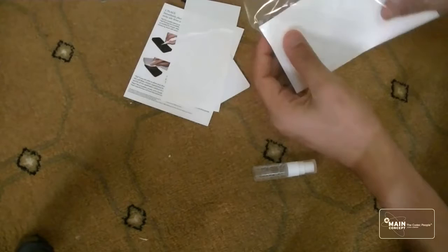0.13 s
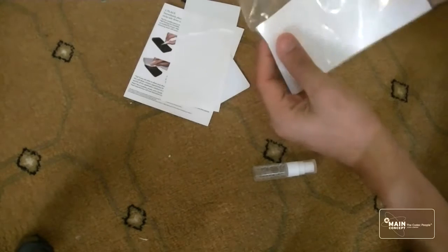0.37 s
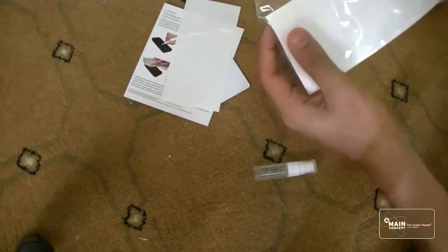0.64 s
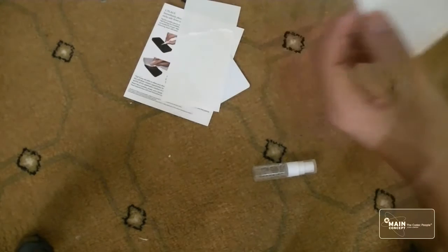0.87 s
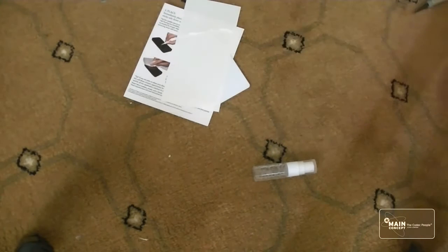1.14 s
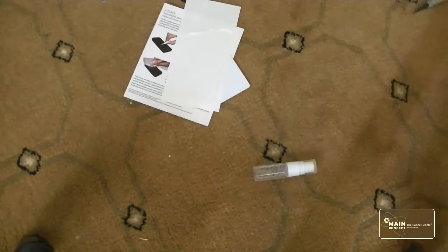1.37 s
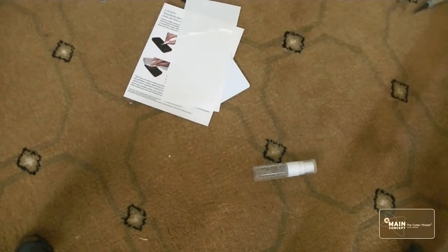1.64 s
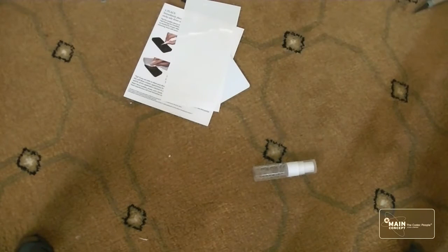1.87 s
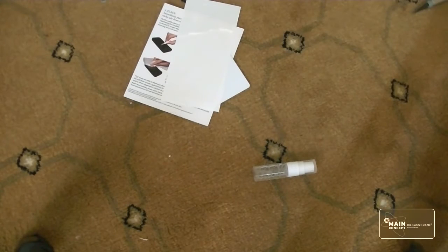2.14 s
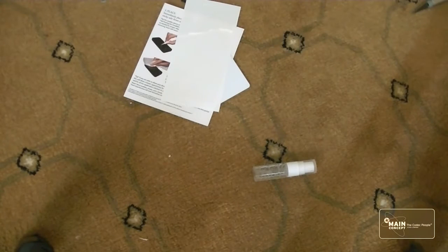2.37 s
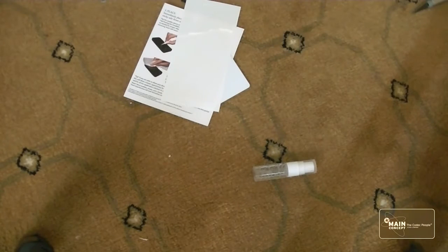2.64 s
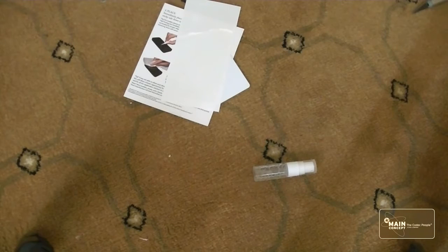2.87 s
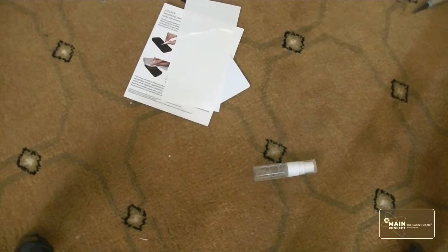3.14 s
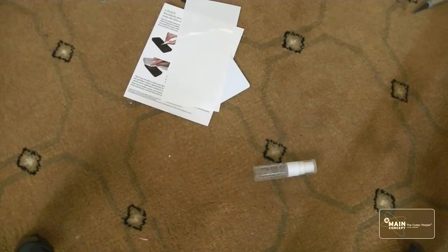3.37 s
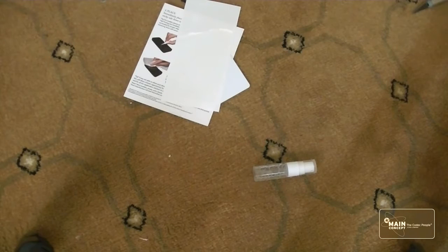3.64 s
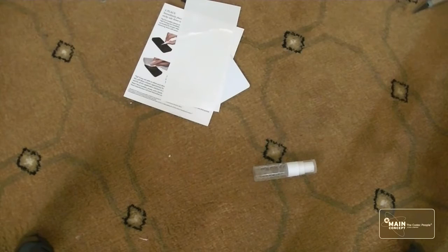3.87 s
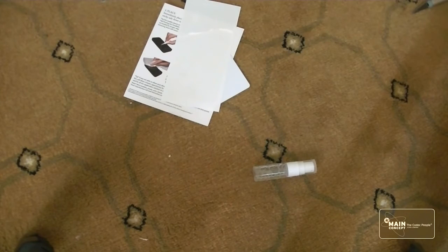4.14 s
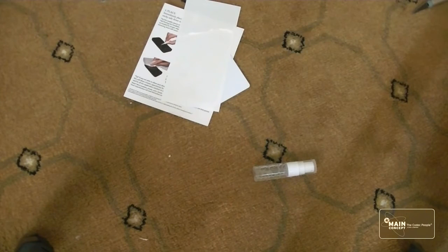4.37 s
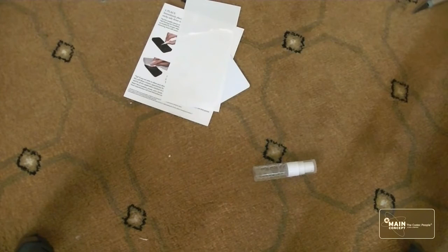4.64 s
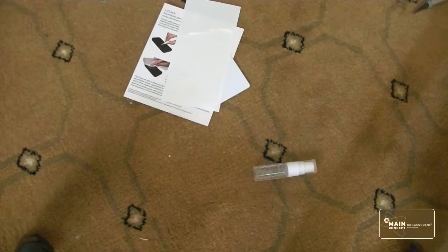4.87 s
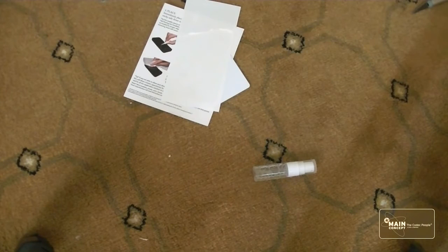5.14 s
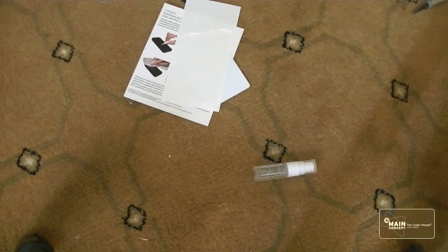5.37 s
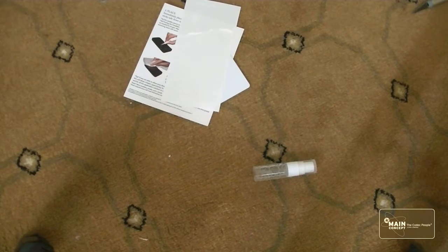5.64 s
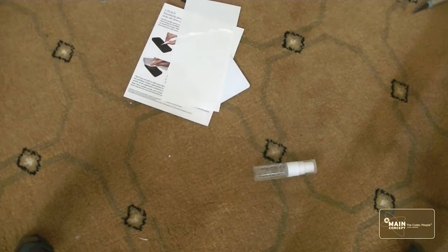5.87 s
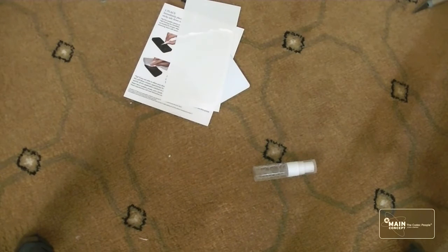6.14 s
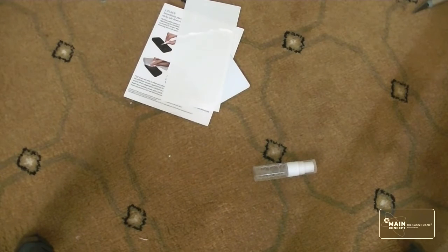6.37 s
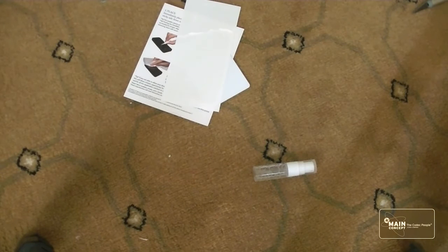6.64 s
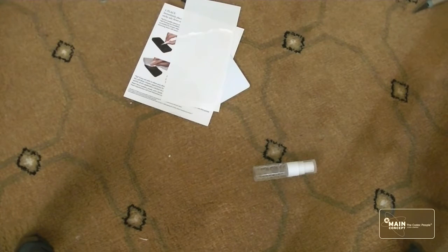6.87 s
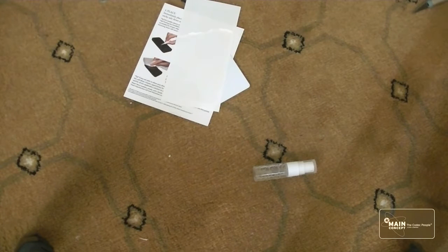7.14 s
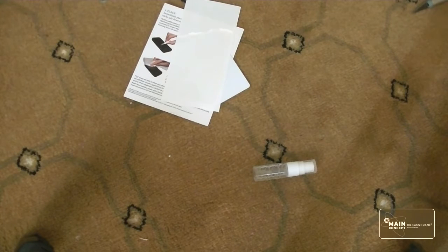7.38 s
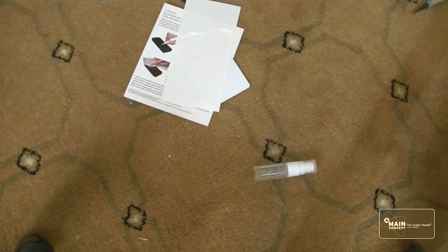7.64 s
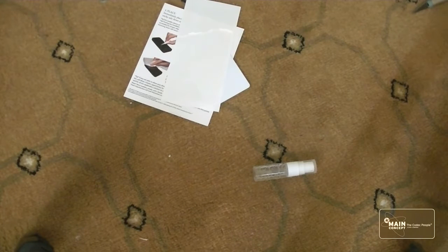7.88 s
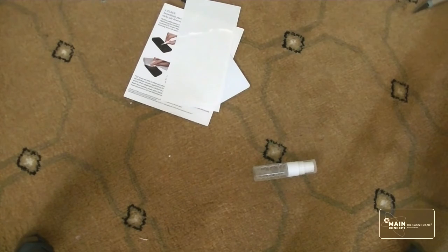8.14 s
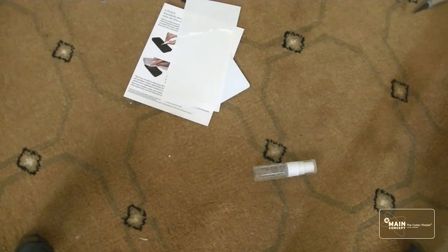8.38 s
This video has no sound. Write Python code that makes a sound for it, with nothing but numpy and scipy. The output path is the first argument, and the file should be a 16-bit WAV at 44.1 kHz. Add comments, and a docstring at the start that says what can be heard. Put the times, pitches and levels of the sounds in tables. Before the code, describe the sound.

A thin plastic sleeve is handled very near a stereo microphone in a quiet carpeted room, slightly stronger on the right. From 0 to 0.5 seconds, a quick cluster of dry crinkles and rustle; then sparse isolated ticks until about 1.5. From 1.6 to 3, scattered snaps with dull soft finger bumps. Between 3.1 and 4.2 the crackling thickens, with sharper pops near 3.2 and 3.5 and a rustle swell at 4.1. Some snaps around 4.45, then a thin, quiet stretch to 5.4. A strong burst of crackle and sliding rustle at 5.8 to 6.05, then separate clear snaps through 7.4. A tiny squeak near 7.56, a loud pop at 7.6, and from 7.9 to 8.4 the densest, loudest crumpling, with bumps, easing slightly before it cuts off. Very faint low hum and soft air throughout; short room decay.

```python
"""Carpeted room: hands work a thin plastic sleeve just beside a camera.
Creases buckle with short dry snaps: ragged impulses through broad resonances. Under them, clumps of
smaller creases crackle and noise in the same resonances makes a sliding rustle. Fingers bump the sleeve
(dull noise pushes) and taut film squeaks (wavering sines). A far machine hums at two partials over
room-tone noise; decaying noise tails give the brief room answer."""
import sys
import numpy as np
from scipy import signal
from scipy.fft import rfft, irfft, next_fast_len
from scipy.io import wavfile
from scipy.ndimage import map_coordinates

SR = 44100
rng = np.random.default_rng(int(sys.argv[2]) if len(sys.argv) > 2 else 0)


def natural_amplitude(level_db):
    """Convert a level in decibels to a linear amplitude factor, elementwise."""
    exponent = np.asarray(level_db, float) / 20
    return 10 ** exponent


def dump(signal):
    """Clip the signal to [-1, 1] and save it as 16-bit WAV at the path in sys.argv[1]."""
    limited = np.clip(np.atleast_2d(signal).T, -1, 1)
    pcm = np.round(limited * 32767).astype(np.int16)
    wavfile.write(sys.argv[1], SR, pcm)


N = 375291


def unit(x):
    """Scale to rms 1."""
    return x / np.sqrt(np.mean(x ** 2) + 1e-20)


def along(points, hz):
    """(Hz, value) points read on a log-frequency axis."""
    f, v = np.transpose(points)
    return np.interp(np.log(hz + 1), np.log(f + 1), v)


def curves(rows, s):
    """Each column after the time, read at times s."""
    t, *cols = np.transpose(rows)
    return [np.interp(s, t, c) for c in cols]


def wobble(rate_hz, s):
    """Smooth random curve, rate_hz knots a second, read at times s."""
    knots = rng.standard_normal(int(N * rate_hz / SR) + 4)
    return map_coordinates(knots, [s * rate_hz])


def filtered(x, response):
    """x times a complex response of frequency."""
    m = next_fast_len(N + SR // 2)
    return irfft(rfft(x, m) * response(np.fft.rfftfreq(m, 1 / SR)), m)[..., :N]


def causal(spectrum, size, shift):
    """Minimum-phase responses of this colour via the folded cepstrum, one per pitch shift."""
    hz = np.fft.rfftfreq(size, 1 / SR) / shift[:, None]
    cep = irfft(np.log(natural_amplitude(along(spectrum, hz))))
    cep[:, 1:size // 2] *= 2
    cep[:, size // 2 + 1:] = 0
    return np.exp(rfft(cep))


def place(rows, s):
    """Sum of the rows, each starting at its time s."""
    at = np.round(s * SR).astype(int)[:, None] + np.arange(rows.shape[1])
    return np.bincount(at.ravel(), rows.ravel(), N + SR)[:N]


# room tone colour: (frequency [Hz], relative level [dB])
AIR_COLOUR = [(15, -42), (25, -18), (70, -33), (200, -21), (300, -14.5), (430, -6), (820, -3),
              (3160, -10.5), (3820, -12.5), (4740, -13.5), (13200, -31.5), (16000, -81)]
# left-right likeness: (frequency [Hz], correlation [0-1])
AIR_LIKENESS = [(30, 0.88), (250, 0.33), (1000, 0.46), (4000, 0.66), (6500, 0.91), (8000, 1)]


def air():
    """Steady room tone: mid and side noise, mixed for the correlation at each frequency."""
    def mid_side(hz):
        turn_rad = np.arccos(np.clip(along(AIR_LIKENESS, hz), -1, 1)) / 2
        return natural_amplitude(along(AIR_COLOUR, hz)) * [np.cos(turn_rad), np.sin(turn_rad)]

    mid, side = filtered(rng.standard_normal((2, N)), mid_side)
    return natural_amplitude(-61.5) * unit(np.array([mid + side, mid - side]))


# far machine: (time [s], fundamental [Hz], 2nd partial [dB rms], 3rd partial [dB rms])
HUM_TRACK = [(0, 143, -95, -82), (.3, 143.3, -77.5, -78), (1.15, 144, -83, -72.5), (1.7, 138.7, -100, -79),
             (2.7, 139.5, -90, -80.5), (4.1, 136.2, -94, -86), (4.3, 135.6, -82.5, -90),
             (5.4, 137.9, -86.5, -94), (8.51, 134.7, -94, -108)]


def hum():
    """Second and third partials of a slowly sagging machine tone, each a little unsteady."""
    s = np.arange(N) / SR
    hz, second_db, third_db = curves(HUM_TRACK, s)
    phase = 2 * np.pi * np.cumsum(hz) / SR
    second = natural_amplitude(second_db + 3 * wobble(5, s)) * np.sin(2 * phase)
    third = natural_amplitude(third_db + 1.3 * wobble(8.9, s)) * np.sin(3 * phase)
    return np.sqrt(2) * (second + third)


# room decay: (frequency [Hz], t60 [s])
ROOM_DECAY = [(150, 0.2), (400, 0.8), (800, 0.23), (2000, 0.22), (5500, 0.14), (12000, 0.13)]


def room(x, size=8192, delay=90):
    """Diffuse answer, equal at both ports; a new random noise tail for each overlapping stretch."""
    out = np.zeros(N + SR)
    fade = np.sin(np.pi * np.arange(size) / size)  # stretches overlap at constant power
    for start in range(0, N, size // 2):
        hz, t, z = signal.stft(rng.standard_normal(SR // 4), SR, nperseg=256)
        decay = natural_amplitude(-60 * t / along(ROOM_DECAY, hz)[:, None])
        tail = signal.istft(z * decay, SR, nperseg=256)[1]
        piece = x[start:start + size]
        wet = signal.fftconvolve(piece * fade[:len(piece)], tail / np.linalg.norm(tail))
        out[start + delay:start + delay + len(wet)] += wet
    return out[:N]


# scatter off the camera body: (frequency [Hz], level re direct [dB])
SCATTER_COLOUR = [(100, -9), (300, -13), (1000, -21), (4000, -18.5), (9000, -15), (14000, -9)]


def scatter(x):
    """Camera-body scatter: quarter cycle shifted, opposite at the two ports, strength randomly wavering."""
    wavering = x * (1 + 0.73 * wobble(30, np.arange(N) / SR))
    return filtered(wavering, lambda hz: 1j * natural_amplitude(along(SCATTER_COLOUR, hz))) * [[1], [-1]]


# taut film under a finger: (time [s], length [s], pitch [Hz], level [dB])
SQUEAK_EVENTS = [(5.305, .04, 950, -56), (7.557, 0.026, 1146, -45.5)]


def squeaks():
    """Rough, wavering tones that swell and fade."""
    s, out = np.arange(N) / SR, 0
    for start_s, length_s, hz, db in SQUEAK_EVENTS:
        swell = np.sin(np.pi * np.clip((s - start_s) / length_s, 0, 1)) ** 2
        level = natural_amplitude(db + 3.7 * wobble(150, s))
        phase = 2 * np.pi * hz * np.cumsum(1 + 0.05 * wobble(200, s)) / SR
        out = out + level * swell * np.sin(phase)
    return out


# finger contacts: (time [s], peak level [dB], pitch [Hz])
BUMP_EVENTS = [(1.623, -44, 720), (1.885, -46, 703), (2.269, -34.5, 740), (2.604, -40, 790),
               (2.934, -39, 776), (3.078, -49, 484), (3.391, -42.5, 725), (3.56, -42, 859),
               (3.861, -36.5, 860), (3.953, -45, 694), (4.023, -41, 883), (4.085, -43, 875),
               (4.465, -44, 890), (4.786, -47, 820), (6.101, -36, 894), (6.785, -33, 899),
               (7.986, -34.5, 890), (8.108, -33, 719), (8.265, -34.5, 725), (8.462, -39.5, 730)]
# their dull colour: (frequency [Hz], relative level [dB])
BUMP_COLOUR = [(25, -33), (120, -29), (250, -10.5), (400, -6), (500, 2), (650, 0.5), (1300, -33),
               (5000, -97)]
BUMP_COLOUR_HZ = 500  # pitch for which the colour is drawn
BUMP_T60_S, BUMP_RISE_S = 0.044, 0.0015


def bumps(size=4096):
    """Soft contacts: a short dying push of noise in a dull colour."""
    s, peak_db, hz = np.transpose(BUMP_EVENTS)
    t = np.arange(size) / SR
    envelope = natural_amplitude(-60 * t / BUMP_T60_S) * (1 - np.exp(-t / BUMP_RISE_S))
    push = rng.standard_normal((len(s), size)) * envelope
    rows = irfft(rfft(push) * causal(BUMP_COLOUR, size, hz / BUMP_COLOUR_HZ))
    rows *= (natural_amplitude(peak_db) / abs(rows).max(axis=1))[:, None]
    return place(rows, s)


# changing rustle of the hands on the film, lulls and sudden bursts:
# (time [s], reference level [dB], brightness [dB])
HAND_WORK = [(0.0, -47.5, -12), (0.2, -52.5, -2), (0.33, -58, -5), (0.43, -61.5, -7), (0.71, -62, -2.5),
             (1.05, -59.5, -2), (1.11, -57.5, 3), (1.18, -67, -3), (1.59, -60.5, -10), (1.94, -56, -2),
             (2.2, -66, -3), (2.33, -47.5, -4.5), (2.36, -65, -3), (2.61, -62.5, -5.5), (2.89, -65.5, 2),
             (3.13, -53.5, -8), (3.46, -53, -7), (3.86, -53.5, -0.5), (3.98, -52.5, -3), (4.1, -40, -7),
             (4.24, -77, -1), (4.55, -67, -1), (4.76, -74, -9), (4.79, -46, 0.5), (4.83, -60, 0),
             (5.05, -62.5, 0), (5.31, -60, -5.5), (5.77, -66, -3), (5.795, -43.5, -11), (5.9, -51, -7),
             (5.97, -36.5, -4), (6.02, -40.5, -9), (6.19, -58, -4.5), (7.13, -59, -4.5), (7.39, -54, -4),
             (7.42, -50, -13), (7.455, -46, -5.5), (7.51, -42.5, -7), (7.55, -54, 4), (7.57, -49, 2),
             (7.6, -49, -2), (7.68, -60, -8), (7.89, -57, -3), (8.01, -43, -10), (8.08, -44.5, -5),
             (8.2, -42.5, -5.5), (8.46, -60.5, -4), (8.51, -45, -1)]
STIR_DB, STIR_S = -10.5, 0.015  # share of a large crease's energy left as rustle; its 1/e time


def hands(s):
    """Rustle level and brightness at times s: lulls and bursts plus the stir left by each large crease."""
    work_db, bright_db = curves(HAND_WORK, s)
    at, body_db, _, _, edge_db, _ = np.transpose(SNAP_EVENTS)
    grid = np.arange(0, N / SR + .001, .001)
    energy = .004 * natural_amplitude(2 * body_db) * (1 + natural_amplitude(2 * edge_db))  # body level is over 4 ms
    lag = grid - at[:, None] - .001
    stir = energy @ (np.exp(-abs(lag) / STIR_S) * (lag > 0)) / STIR_S
    power = natural_amplitude(2 * work_db) + natural_amplitude(2 * STIR_DB) * np.interp(s, grid, stir)
    return 10 * np.log10(power), bright_db


# five film resonances: body, edge, crack, sizzle, then the low thud: (frequency [Hz], relative level [dB])
BODY_COLOUR = [(300, -73.5), (900, -12), (1300, -4.5), (1600, 8.5), (1950, -3), (2400, -14.5), (5000, -68)]
EDGE_COLOUR = [(700, -74), (1900, -4), (2300, 2), (2900, 3), (3700, -9.5), (4500, -12), (8000, -59.5)]
CRACK_COLOUR = [(1500, -62.5), (3500, 0), (4100, -3), (4700, 8), (5300, 5), (6100, -0.5), (7500, -15),
                (12000, -48)]
SIZZLE_COLOUR = [(3000, -58.5), (7000, 6), (8000, -1), (10000, -7), (13000, -16.5), (16000, -41),
                 (17000, -49)]
THUD_COLOUR = [(30, -32), (200, -35), (270, -25), (500, -16), (850, -4), (1150, -6), (1600, -23),
               (4000, -102.5)]
COLOURS = [BODY_COLOUR, EDGE_COLOUR, CRACK_COLOUR, SIZZLE_COLOUR, THUD_COLOUR]


def slide():
    """Film gliding over film and skin: noise in the five resonances, each breathing on its own."""
    s = np.arange(N) / SR
    level_db, bright_db = hands(s)
    clumps_db = 3 * wobble(90, s)  # the glide catches and frees
    offsets_db = [-3, -5, bright_db + 1.5, bright_db - 8.0, -11]
    out = 0
    for colour, db in zip(COLOURS, offsets_db):
        rub = unit(filtered(rng.standard_normal(N), lambda hz: natural_amplitude(along(colour, hz))))
        out = out + natural_amplitude(level_db - 9.5 + db + clumps_db + 2.5 * wobble(25, s)) * rub
    return out


# nominal drive of body, edge, crack, sizzle, thud, before per-crease stretch: t60 [s]
DRIVE_T60 = [0.012, 0.021, 0.0093, 0.0097, 0.021]
BODY_COLOUR_HZ = 1600  # pitch for which the body colour is drawn
USUAL_DB = -43.5  # usual body level


def buckle(s, body_db, body_hz, above_db, length, size):
    """A crease flips at once, then settles in a ragged run of weaker slips; all drive the five resonances."""
    t = np.arange(size) / SR
    slips = 0.047 * rng.standard_normal((len(s), size)) ** 3  # sparse: a few strong among many faint
    slips[:, :3] += [1.2, 0, 0] + 0.62 * rng.standard_normal((len(s), 3))  # the flip, clean or ragged
    stretch = length * np.exp(0.14 * rng.standard_normal((len(s), 1)))  # some creases settle slower
    stretch = stretch * natural_amplitude(0.063 * np.clip(body_db - USUAL_DB, -15, 5))[:, None]  # small ones sooner
    patches = np.exp(0.12 * np.linspace(-1, 1, 7))  # film patch size shifts the resonances
    rows = 0
    for colour, t60_s, db in zip(COLOURS, DRIVE_T60, [0, *above_db]):
        if colour is BODY_COLOUR:  # each fold rings at its own pitch
            response = causal(colour, size, body_hz / BODY_COLOUR_HZ)
        else:
            response = causal(colour, size, patches)[rng.integers(len(patches), size=len(s))]
        own_t60_s = t60_s * stretch * rng.uniform(0.81, 1.54, stretch.shape)
        part = irfft(rfft(slips * natural_amplitude(-60 * t / own_t60_s)) * response)
        gain = natural_amplitude(body_db + db) * np.sqrt(.004 * SR) / np.linalg.norm(part, axis=1)  # rms over 4 ms
        rows = rows + part * gain[:, None]
    return place(rows, s)


def crackle(count=3000):
    """Small creases in clumps: a few large among many tiny, of scattered colour."""
    s = rng.uniform(0, N / SR, count)
    level_db, bright_db = hands(s)
    clumps_db = 3.6 * np.clip(wobble(40, s), -3, 1)
    sizes_db = 2.75 * np.minimum(rng.exponential(1, count), 3.5)
    body_db = level_db - 11.0 + clumps_db + sizes_db
    flat = np.zeros(count)
    above_db = np.array([flat - 3, bright_db - 8.0, bright_db - 13.0, flat - 12])
    above_db = above_db + 5 * rng.standard_normal((count, 4)).T
    body_hz = 1620 * np.exp(0.15 * rng.standard_normal(count))
    return buckle(s, body_db, body_hz, above_db, length=0.85, size=384)


# large creases: (time [s], body level over 4 ms [dB], body pitch [Hz], crack over body [dB],
# edge over body [dB], sizzle over crack [dB])
SNAP_EVENTS = [(0.0093, -38.5, 1700, -12, -16, -9), (0.0437, -38.5, 1600, -15, -9, 2.5),
               (0.074, -43, 1650, -3, -9, -7), (0.097, -53, 1430, -9, 6, -10),
               (0.107, -47.5, 1710, -3, 2, -5), (0.1223, -32.5, 1710, -8.5, -8, -14),
               (0.1405, -39.5, 1770, -20, 0, -6), (0.147, -52, 1800, -8, 5, -11),
               (0.1577, -35, 1770, -18, -8, -4), (0.162, -46, 1970, -3, 5, -13),
               (0.1849, -34.5, 1950, -5, 4, 2), (0.2113, -44, 1830, -18, -14, -10),
               (0.2629, -42.5, 1810, -7, 2, -10), (0.3305, -49, 1600, -6.5, -3, -10),
               (0.3457, -45, 1750, -22, -4, -11), (0.3625, -50, 1620, -18, -3, -5),
               (0.3853, -39, 1470, -22, -8, -12), (0.3902, -39, 1340, -26, -1, -13),
               (0.4022, -43, 1590, -12, 1, -10), (0.4063, -48.5, 1850, 5, 13, -8),
               (0.4733, -36, 1460, -13.5, -5, -4), (0.495, -40.5, 2080, -10, -5.5, -7),
               (0.6388, -42, 1790, 11, 2, -11.5), (0.6743, -55.5, 1890, -9, 7, -16),
               (0.6944, -54, 1930, -4, 3, -12), (0.985, -46.5, 1490, -1, -5, -16),
               (0.992, -48.5, 1830, 3, 6, -5), (0.9996, -48.5, 1480, 10, 2, -22),
               (1.143, -41, 1530, -9, -8, -20), (1.2042, -38.5, 1440, -6, -2, -8),
               (1.232, -55, 1850, -11, 4, -14), (1.2465, -44.5, 2020, -6, 3, -12),
               (1.3359, -55.5, 1700, 7.5, 9.5, -17), (1.36, -50.5, 1500, -17, -1, -2),
               (1.385, -50.5, 1300, -2.5, -5, -10), (1.5292, -49.5, 1470, -8.5, -1, -12),
               (1.6277, -41, 1480, -7, -20, -13), (1.73, -41, 1990, -3.5, -3, -10),
               (1.7554, -52, 2000, -5, -5, -10), (1.7811, -46, 1450, -4, -1, -11),
               (1.8028, -41, 1570, -5.5, -9, -12), (1.8864, -34, 1760, -10.5, 2, 2),
               (1.8922, -49, 1720, -10, -4, -5), (1.909, -41, 1340, -14, -15, -8),
               (1.924, -44, 1300, -6, -1, -7), (1.9385, -34.5, 1640, -12, -5, -15),
               (1.9852, -40, 1690, -10, 1, 2), (2.0226, -47.5, 1470, 0.5, -1, -11),
               (2.0805, -31, 1610, -11.5, -6, 1), (2.172, -52, 1570, -9, -6, -15),
               (2.1881, -49.5, 1440, -5, 1, -16), (2.2076, -49, 1290, -13, 5.5, -13),
               (2.262, -38, 1570, -23, -14, -9), (2.2688, -35, 1310, -11.5, -4.5, -11),
               (2.281, -43.5, 1730, -3.5, -9, -1.5), (2.308, -53, 1330, -1, -4, -7),
               (2.422, -46.5, 1480, 3, 2, -15), (2.5417, -48.5, 1470, -8, -6, -19),
               (2.591, -55, 1640, 4.5, -4, -18), (2.6062, -41.5, 1410, -18, -8.5, -15),
               (2.7595, -49.5, 1460, 1, -0.5, -14), (2.7937, -46.5, 1520, -12, -4, -13),
               (2.799, -49.5, 1750, 11, 9, -11.5), (2.8628, -44.5, 1900, -1.5, -3.5, -22),
               (2.9404, -35.5, 1650, -3.5, -13, -7), (2.966, -46.5, 1580, -2.5, -4, -15),
               (2.9847, -45.5, 1240, -9, -10, -18), (2.9967, -48, 1720, -21, -5, -11),
               (3.03, -42.5, 1310, 1.5, 2.5, -31), (3.0491, -38.5, 2030, -7, -18, -19),
               (3.1405, -45.0, 1450, -22, -20, -11), (3.1504, -43, 2000, -19, -17, -15),
               (3.1661, -28, 1700, -14.5, -12.5, -15), (3.183, -44.5, 1610, 7, 5, -8.5),
               (3.1941, -40.5, 1610, -6, -10, -7), (3.2049, -35.5, 2040, -11, -4, -13),
               (3.2459, -35, 1920, 0, -2, -8.5), (3.3182, -41.5, 1730, -5.5, -2, -15),
               (3.393, -38, 1160, -23, -8, -12), (3.4338, -50, 1600, -18, -16, -10),
               (3.4608, -43, 1980, -17, -3, -13), (3.465, -26.5, 1700, -12.5, -11, -12.5),
               (3.5503, -47, 1600, -8, -1, -9), (3.5624, -44, 1720, -24, -17, -8),
               (3.5901, -36, 1580, -10, -8, -19), (3.6037, -42, 1600, -25, -4, -13),
               (3.6107, -33.5, 1790, -10, -6.5, -11), (3.622, -35, 1700, -6.5, 0.5, -6.5),
               (3.6489, -39.5, 1560, -5.5, -8, -16), (3.7343, -54, 1990, 1, 7, -10),
               (3.7424, -42.5, 1640, 0.5, -16, -13), (3.7469, -36.5, 1580, 0, -4.5, -9.5),
               (3.7698, -43.5, 1847, -7, 1.5, -10), (3.7769, -35.5, 1580, -16, -5, -9),
               (3.8086, -40.5, 1610, -5, -14, -4), (3.8671, -29.5, 1810, -3.5, -3, -13.5),
               (3.8908, -36.5, 1500, -19, -15, -11), (3.946, -59, 1680, 9, 1, -12),
               (3.957, -37, 2100, -8, -12, -8), (4.0077, -36.5, 1620, -11, -12, -13),
               (4.0201, -34.5, 2300, -11, -8, -9), (4.0317, -37, 1730, -4, -5, -16),
               (4.0433, -39.5, 1630, 3.5, 2.5, -19), (4.0767, -43, 1530, 4.5, -5, -14),
               (4.0844, -47.5, 1510, 9.5, 8, -10), (4.1125, -53, 1380, -2, 9, -12),
               (4.12, -35.5, 1500, -5, -2.5, -4), (4.1369, -34.5, 1770, -8, -6, -16),
               (4.152, -36.5, 1520, -13, -11, -12), (4.1594, -36, 1560, -2.5, -8, -8.5),
               (4.21, -47, 1460, -4, 5.5, -25), (4.246, -44.5, 1820, -3, 2, -5),
               (4.429, -41, 1680, -12, -2, -17), (4.442, -31, 1730, -18, -5.5, -15),
               (4.4692, -34, 1670, 2.5, -3, -12), (4.4754, -44, 1690, 8, -6, -14),
               (4.4822, -45, 1580, -2, 0, -13), (4.489, -33, 1690, -7.5, -12, -6),
               (4.598, -41.5, 1810, -21, -17, -13), (4.842, -46, 1880, -15, -8, -8),
               (4.847, -39, 2100, -5, -21, -1), (4.8644, -47, 1860, -4, 0, 0.5),
               (4.8725, -43.5, 1460, 5, -1, -15), (4.9973, -40.5, 1570, -1, -5, -11),
               (5.0967, -55, 1805, 1, 1, -18), (5.1057, -51, 1700, 0.5, -0.5, -8),
               (5.2248, -48.5, 1240, 0, -6, -10), (5.263, -48.5, 1760, -4, 1.5, -26),
               (5.4044, -36, 1820, 3.5, 4, -16), (5.4228, -37, 1650, -13, -9, -7),
               (5.4929, -45, 1910, -4.5, 5.5, -7), (5.5165, -39, 2060, -24, -4, -10),
               (5.54, -38.5, 1490, -4.5, -1.5, -8), (5.562, -34, 1640, -6, -10, -8),
               (5.6206, -62, 1796, 12, 10, -14), (5.6266, -47.5, 2000, -10, 1, -14),
               (5.637, -40.5, 1850, 0.5, -13, -14), (5.6444, -42, 1510, -15, 1, -11),
               (5.664, -44.5, 1450, -0.5, -5, -29), (5.7414, -53, 1540, -8, -1, -14),
               (5.7974, -41.5, 1690, -23, -12, -15), (5.8043, -42.5, 1590, -11, -3, -26),
               (5.81, -42, 1600, -13, -13, -17), (5.8276, -49, 1890, 10, 7, -26),
               (5.833, -37.5, 1830, -8, -4, -20), (5.8428, -34, 1550, -11, -13, -8),
               (5.8484, -24.5, 1710, -2.5, 0, -8), (5.8521, -32, 1800, 0.5, 4, -9),
               (5.8616, -29, 1500, -5, -1, -1.5), (5.8672, -40, 1680, 9, 8, -9),
               (5.8847, -37.5, 1520, 3, 3, -21), (5.8927, -29, 1570, -9, -3, -8),
               (5.9077, -37.5, 1440, -24, -15, -9), (5.9166, -48, 1960, -10, 2, -5),
               (5.9364, -40, 1580, 0, -6, -8), (5.9468, -33, 1540, -6, -4, -11),
               (5.967, -30.5, 1410, -6, -8, -12), (5.9761, -37.5, 1714, 3.5, 2, -17),
               (5.98, -49.5, 1800, 10, 13, -10), (6.0194, -36.5, 1470, 0, 2.5, -11),
               (6.0285, -43, 2090, -7, 0, -12), (6.0359, -34, 1670, -7, -9, -2.5),
               (6.046, -39, 1940, 0, 0, -3), (6.1088, -35, 1580, 0.5, 5, -12),
               (6.156, -46, 1500, -6, 1, -4), (6.1827, -35, 2060, -22, -12, -8),
               (6.1925, -42, 1640, -4, 5.5, -11), (6.2843, -55, 1570, -7, -11, -10),
               (6.3484, -51, 1480, -4, 1, -3), (6.37, -34.5, 1520, -4, -1, -6),
               (6.4138, -38.5, 1440, -3, -3.5, -3), (6.478, -45, 2080, -7, -3, -9),
               (6.4971, -41.5, 1150, -3.5, -10, -3.5), (6.5336, -42.5, 1790, -19, 0.5, -13),
               (6.5554, -38.5, 1480, -19, -4.5, -19), (6.569, -46, 1400, -4, -2, -12),
               (6.6582, -47, 1580, -15, -11, 2), (6.6715, -34.5, 1610, 1, 1, -9.5),
               (6.704, -36.5, 1620, -3.5, -3, -1.5), (6.7699, -31.5, 1610, -6.5, -7, -9),
               (6.7908, -31.5, 1440, -3, 6.5, -2), (6.7963, -49, 1700, -6, 1, -19),
               (6.838, -41.5, 1680, -23, -5, -14), (6.8745, -43.5, 1760, -8, 4, -27),
               (6.9227, -61.5, 1830, 10.5, 10, -6), (6.967, -26.5, 1730, -9, -2, -12),
               (7.0599, -31, 1924, -5.5, -2.5, -2.5), (7.1491, -44, 1820, -7.5, -4, -8),
               (7.1842, -39.5, 1630, -6, 0, -15), (7.1973, -31.5, 1570, -4, -3, -14),
               (7.2117, -32, 1590, -1.5, 0.5, -15), (7.25, -43, 1850, 8.5, 5, -14),
               (7.2666, -34, 1830, -12, -8, -8), (7.3449, -28.5, 1660, -10, 0.5, -5),
               (7.368, -34.5, 1960, -20, -1.5, -22), (7.3818, -41, 1810, -20, -14, -14),
               (7.43, -52, 1650, -19, -14, -6), (7.4407, -48, 1780, -15, -7, -1),
               (7.4522, -55, 1700, -8, 13, 4), (7.4917, -40, 1870, -26, -21, -12),
               (7.517, -46, 1880, -14.5, -7, 7), (7.615, -23.5, 1835, -8, -0.5, -4.5),
               (7.6471, -36, 1550, -11, -4, -9), (7.6499, -32.5, 1300, -13.5, -9, -5),
               (7.7061, -47, 1600, -9, -3, -10), (7.8188, -36, 1620, -12, -15, -6),
               (7.8543, -40, 1650, -10, -2, -12), (7.8782, -44, 1780, -6, -2, -3),
               (7.8921, -32, 1650, -17.5, -10, 1), (7.9113, -32, 1830, -6, -3, -7),
               (7.9196, -37, 1590, -12, 1, -11), (7.9244, -39, 1580, -7, -10, -5),
               (7.9282, -29.5, 1540, -9, -16, -6), (7.9358, -27.5, 1620, -16, -9, -13),
               (7.9621, -35.5, 1760, -3, 1, -7), (7.9895, -40, 1520, -11, -12, -8),
               (8, -39, 1860, -13, -10, -10), (8.0198, -56, 1890, 3, 2, -11),
               (8.0317, -40.5, 1900, -7, -1, -9), (8.0376, -37.5, 1700, -4, -10, -15),
               (8.055, -35, 2050, -11, -6, -3), (8.0645, -33.5, 1560, 0.5, -3, -20),
               (8.0838, -29, 1520, -14.5, -18, -2.5), (8.1138, -30.5, 1690, -5, -5, -10),
               (8.1327, -40, 1930, -9, -6, -12), (8.139, -43, 1860, 4.5, 11.5, -8),
               (8.1494, -33, 1590, -1, -9, -11), (8.166, -41, 1600, -16, -1, -10),
               (8.179, -33.5, 1480, -12, -4, -20), (8.1928, -25.5, 1460, -22, -11, -13),
               (8.1982, -23.5, 1520, -14, -17, -12), (8.207, -29, 1520, -4, -7, -12),
               (8.231, -42, 1510, -12, -3, -13), (8.2417, -28.5, 1370, -9.5, -1.5, -10),
               (8.2656, -32, 1130, -10, -16, -14), (8.2731, -32.5, 1950, -12, -2, -16),
               (8.283, -30.5, 1580, -8.5, -7, -5), (8.2935, -27.5, 1760, -8, -7, -10),
               (8.299, -33.5, 1580, -8, -10, -9), (8.327, -35, 1590, -8, -13, -12),
               (8.346, -44, 1530, -24, -14, -11), (8.352, -40, 1170, -17, -11, -22),
               (8.3726, -34.5, 1620, -7, -8.5, -12), (8.4462, -51, 1400, 2.5, 1, -16),
               (8.472, -39.5, 1680, -10, -4, -26), (8.4841, -36.5, 1480, -11, -8, -10)]
THUD_DB, THUD_SCATTER_DB = -9.5, 3.5  # thud over a usual body; its spread, crease to crease
THUD_LAG = 0.51  # loss of relative thud per rise of body [dB/dB]


def snaps():
    """Large creases; the thud grows slower than the body."""
    s, body_db, body_hz, crack_db, edge_db, sizzle_db = np.transpose(SNAP_EVENTS)
    thud_db = THUD_DB - THUD_LAG * (body_db - USUAL_DB) + THUD_SCATTER_DB * rng.standard_normal(len(s))
    above_db = [edge_db, crack_db, crack_db + sizzle_db, thud_db]
    return buckle(s, body_db, body_hz, above_db, length=1.0, size=1024)


def scene():
    """Film close by, its scatter off the camera body, its room answer, and the background."""
    film = snaps() + crackle() + slide() + bumps() + squeaks()
    return film + scatter(film) + natural_amplitude(-11.0) * room(film) + hum() + air()


def roll_off(x):
    """The treble ends steeply here."""
    return signal.sosfilt(signal.butter(12, 16510, fs=SR, output="sos"), x)


# microphone port balance: (frequency [Hz], left over right [dB])
PORT_BALANCE = [(60, -1), (250, -1), (700, -2.5), (2000, -2), (5000, -2), (9000, -1.5)]


def record(dry):
    """Two ports, the left a little weaker, cut above 16.5 kHz."""
    def ports(hz):
        return natural_amplitude(along(PORT_BALANCE, hz) * np.array([[.5], [-.5]])) * (hz < 16500)

    return roll_off(filtered(dry, ports))


dry = scene()
out = record(dry)
dump(out)
```